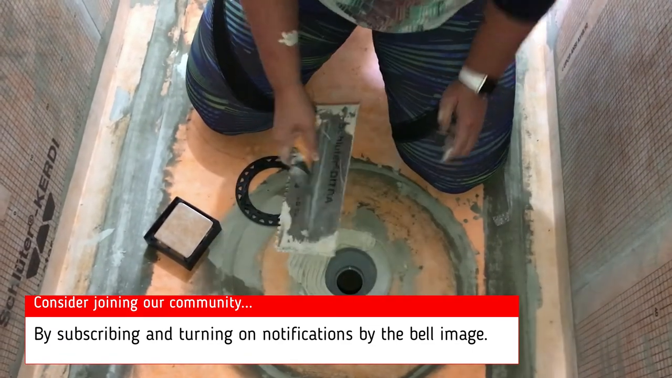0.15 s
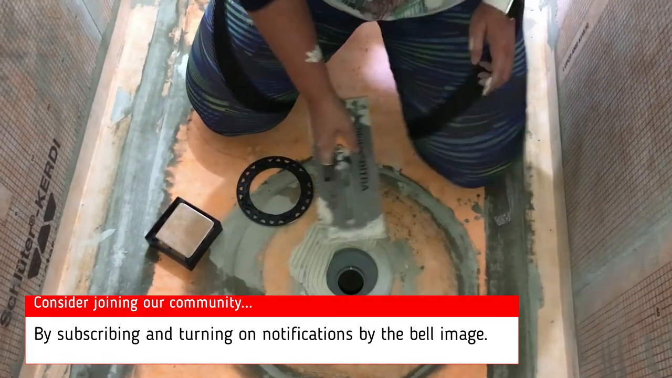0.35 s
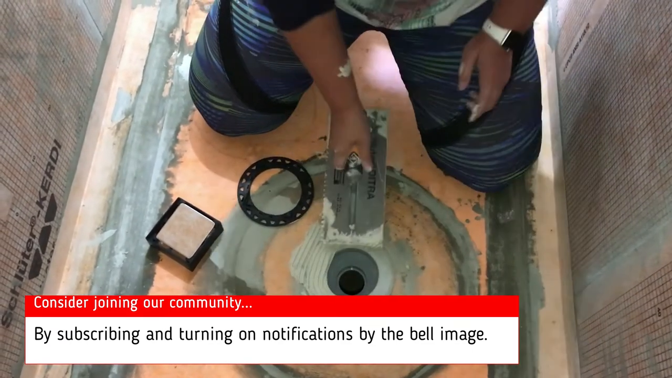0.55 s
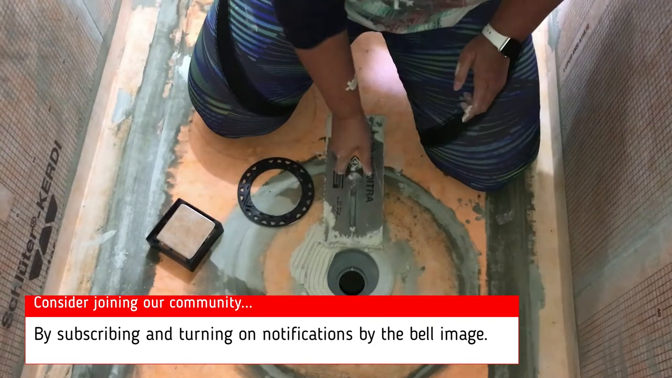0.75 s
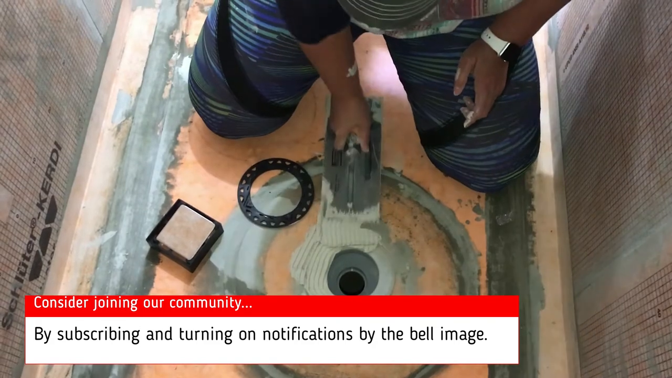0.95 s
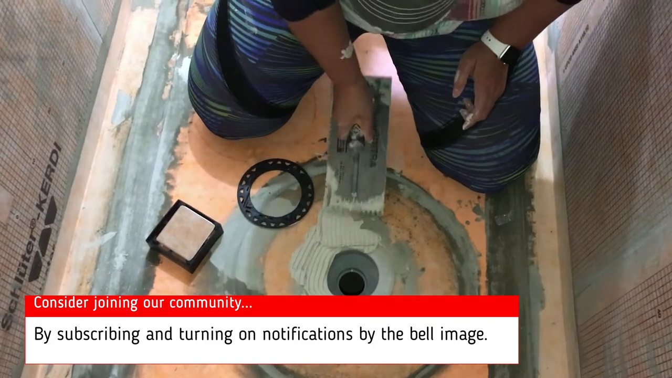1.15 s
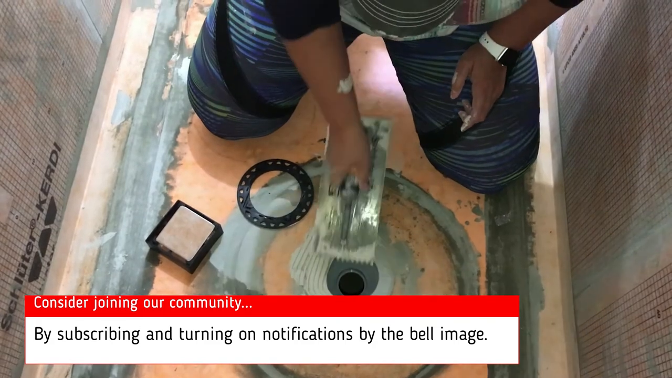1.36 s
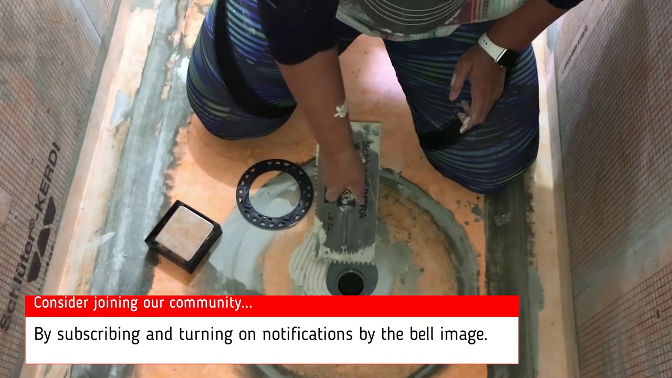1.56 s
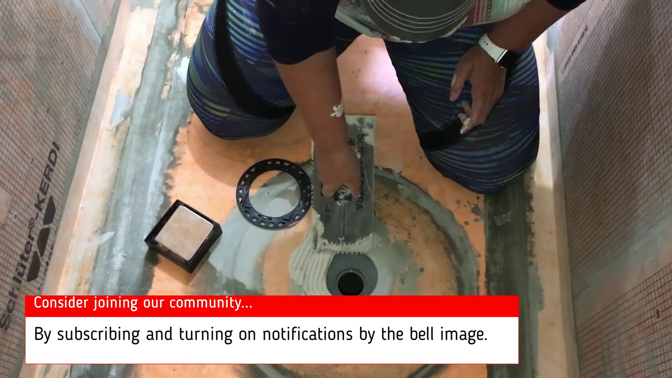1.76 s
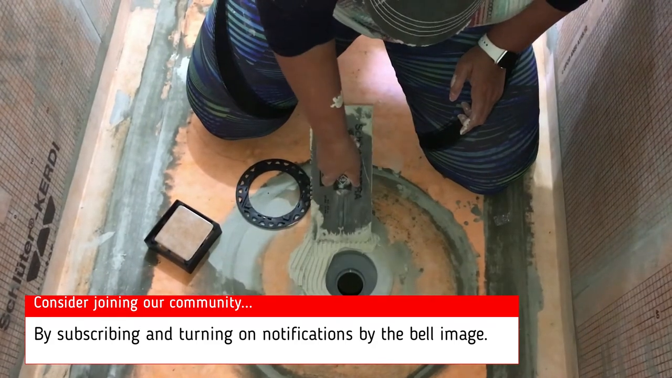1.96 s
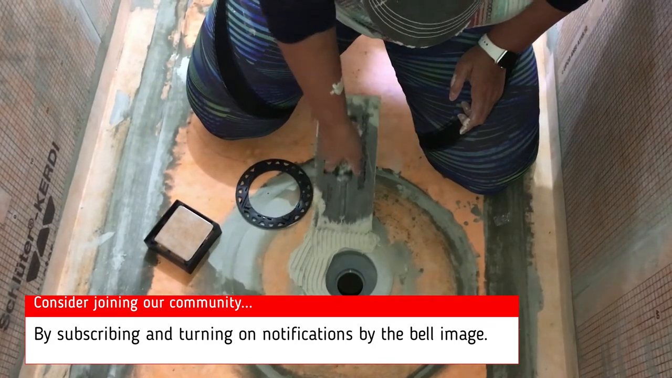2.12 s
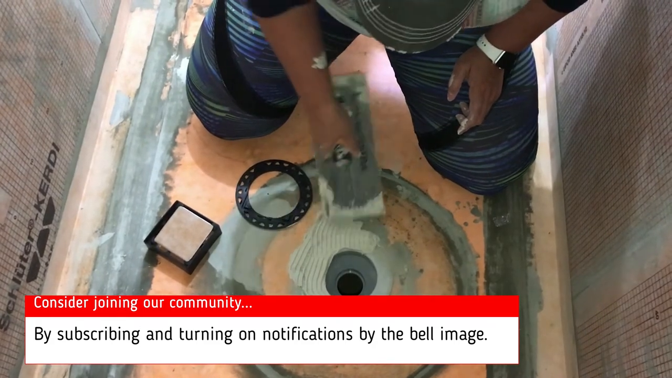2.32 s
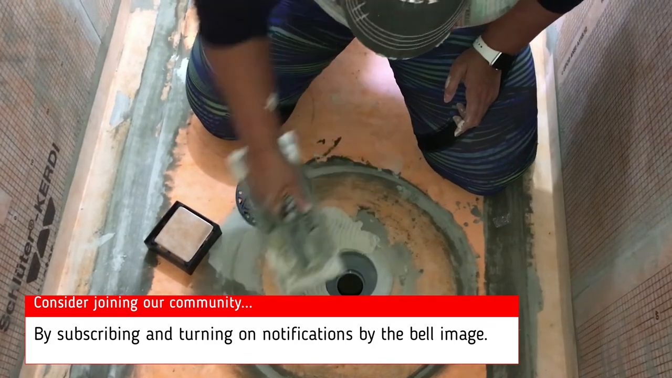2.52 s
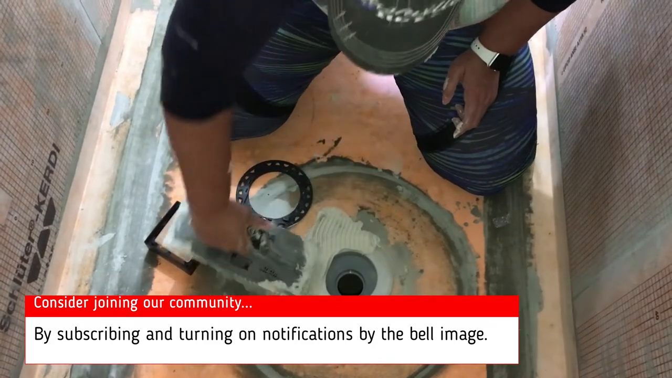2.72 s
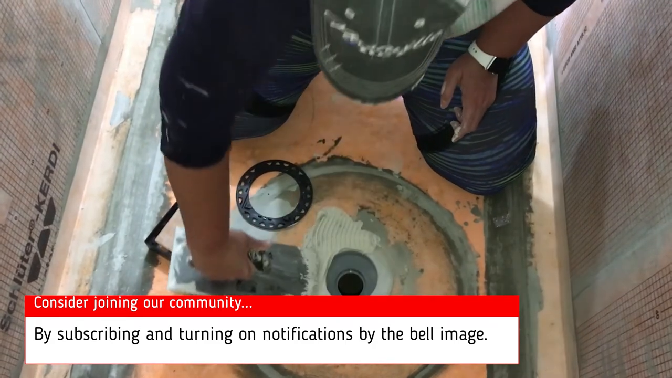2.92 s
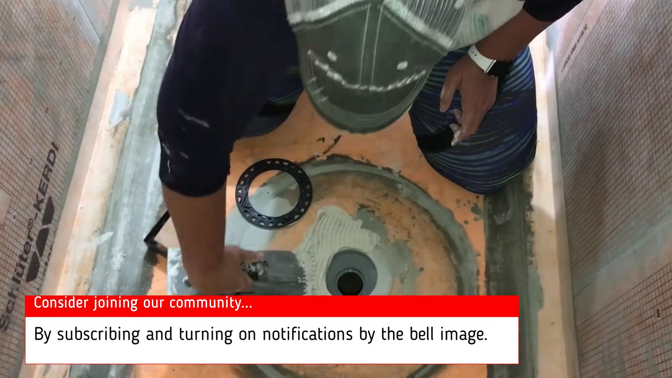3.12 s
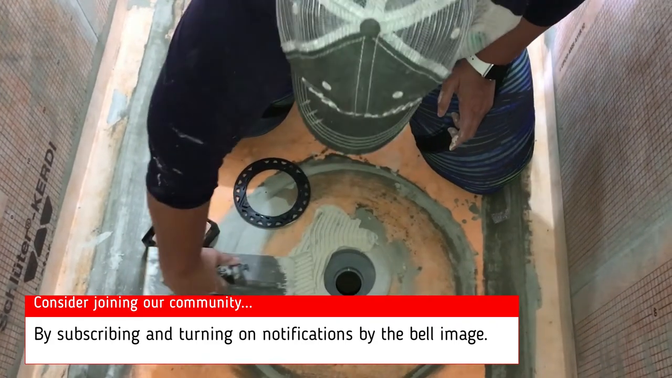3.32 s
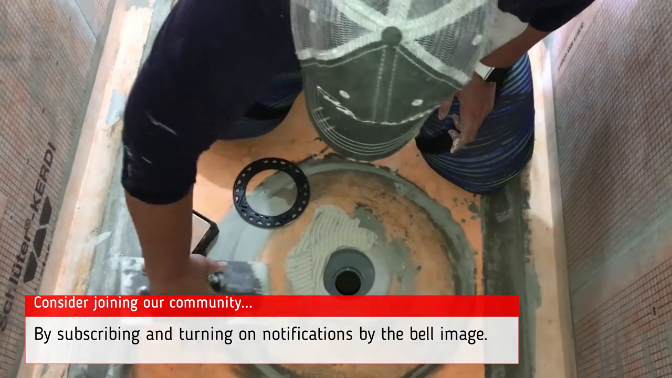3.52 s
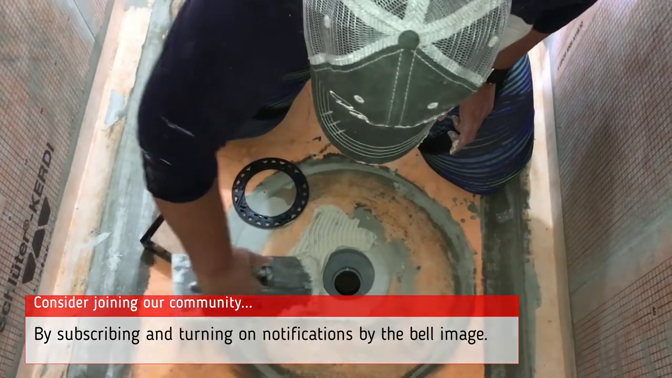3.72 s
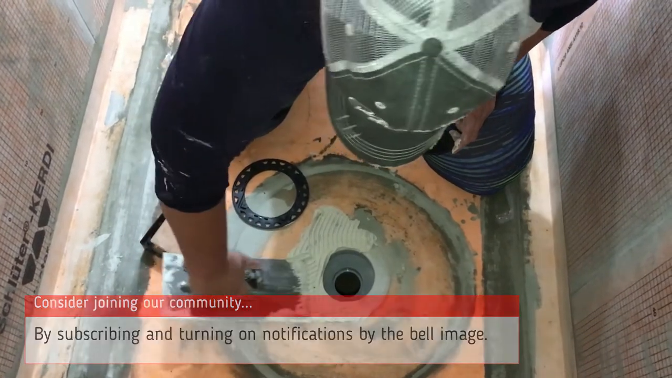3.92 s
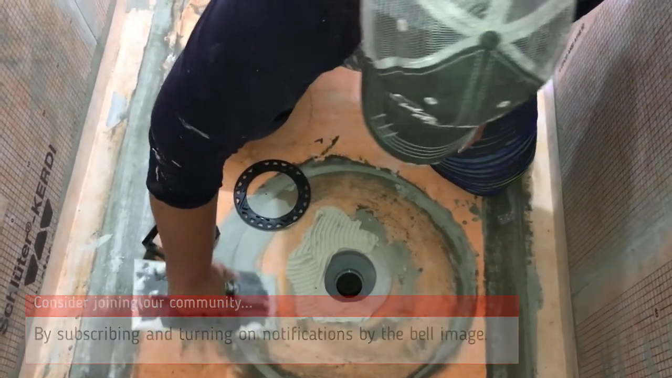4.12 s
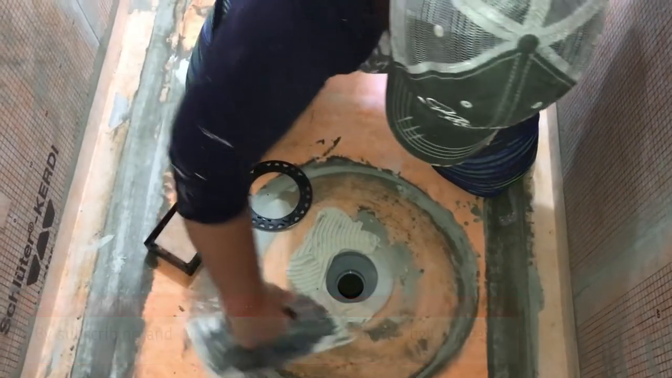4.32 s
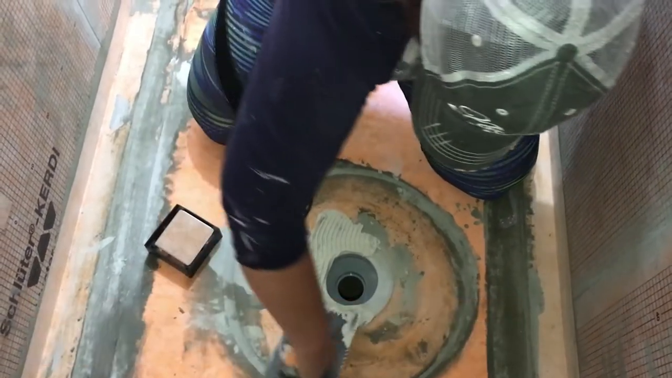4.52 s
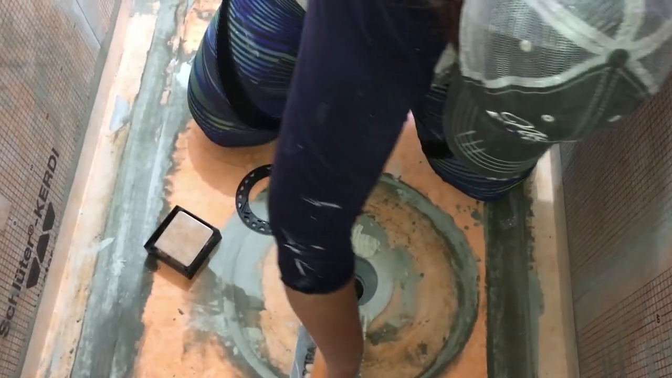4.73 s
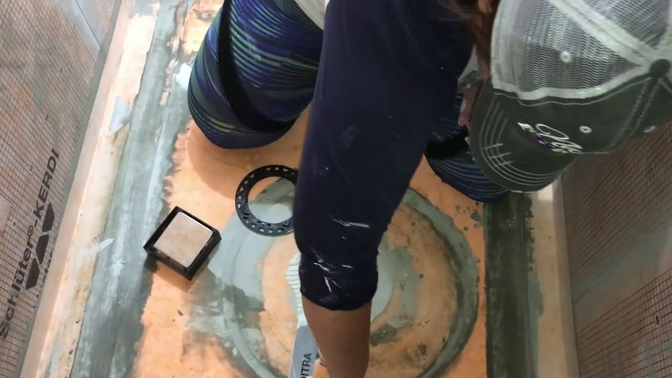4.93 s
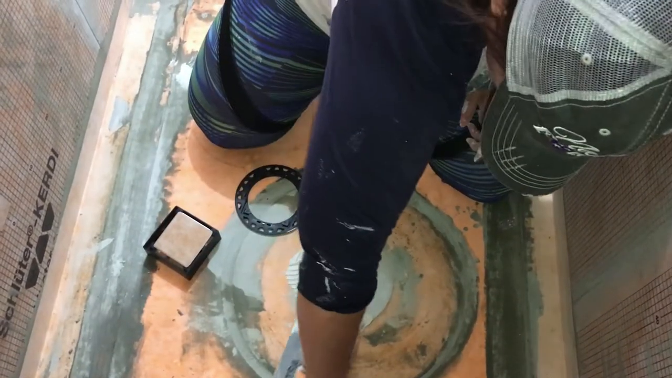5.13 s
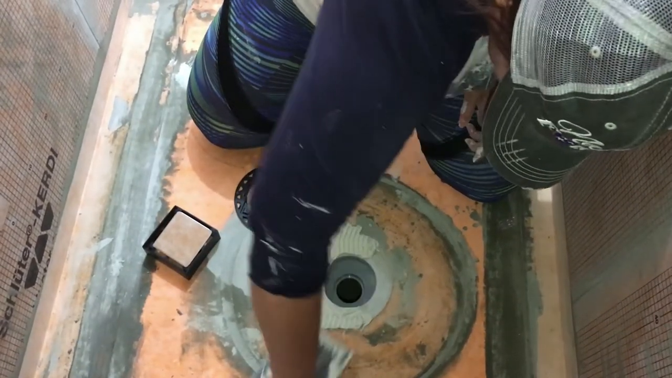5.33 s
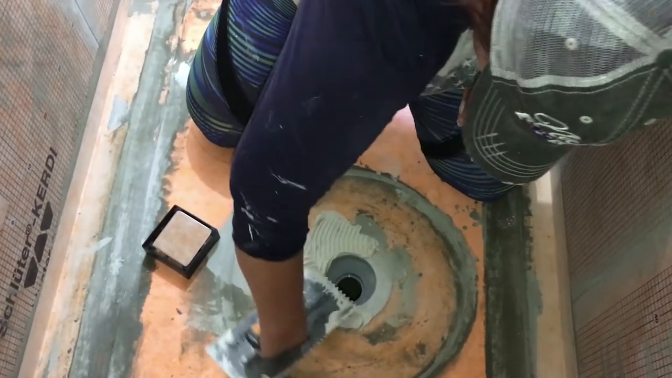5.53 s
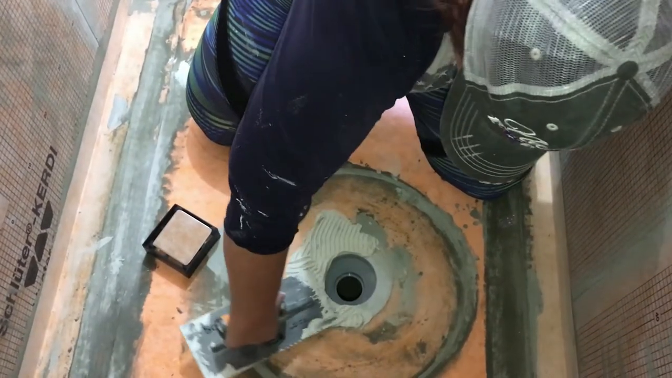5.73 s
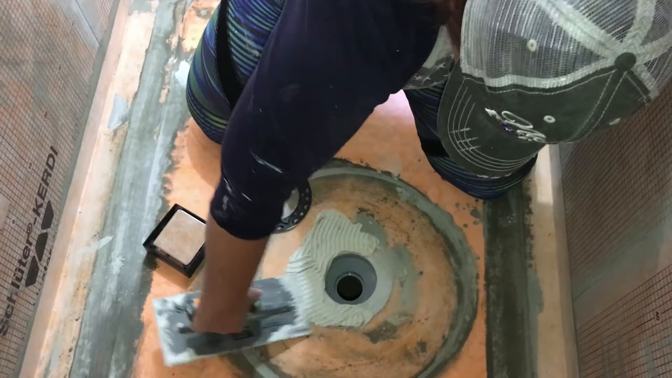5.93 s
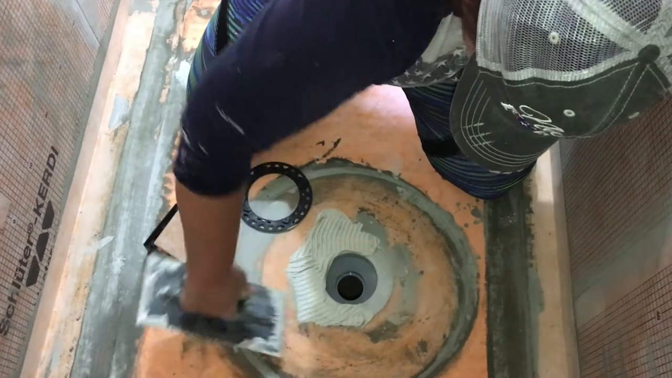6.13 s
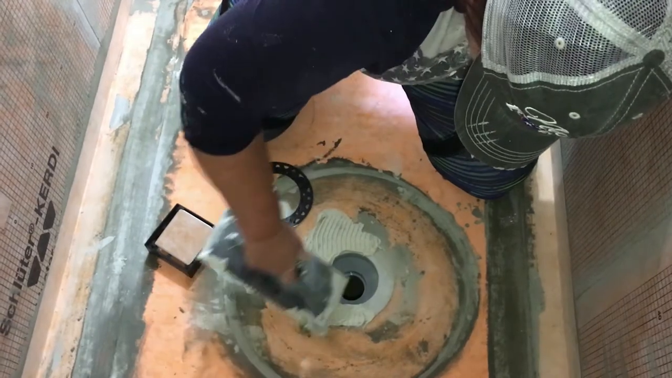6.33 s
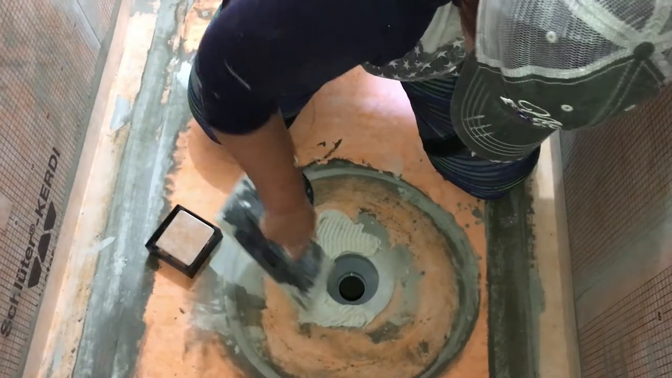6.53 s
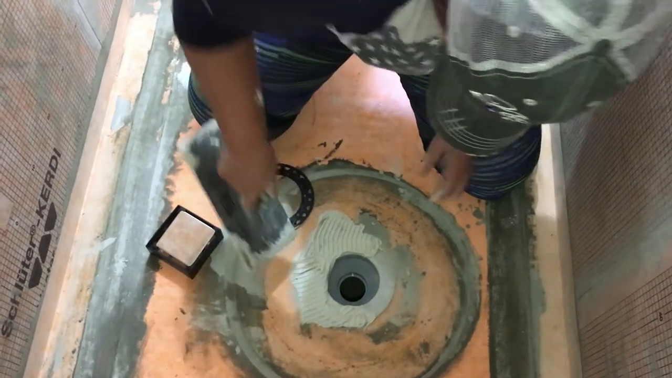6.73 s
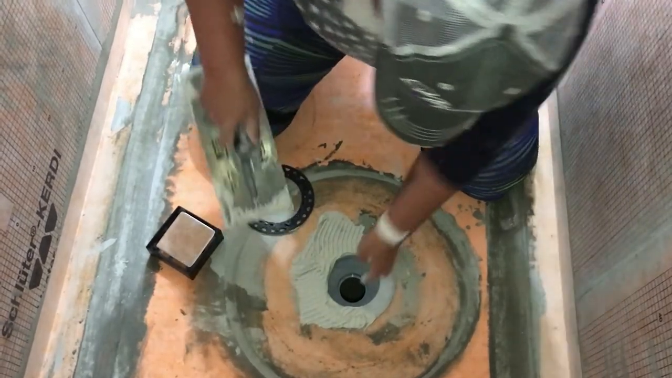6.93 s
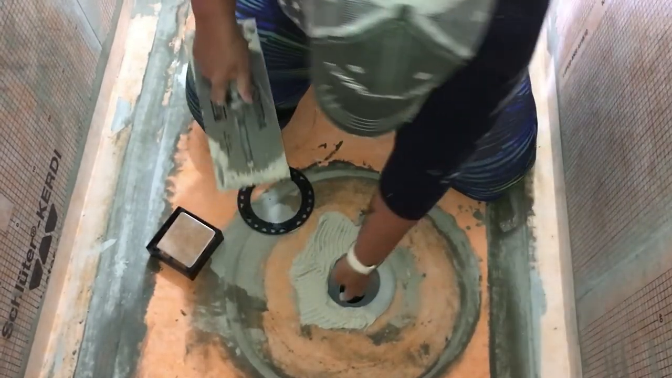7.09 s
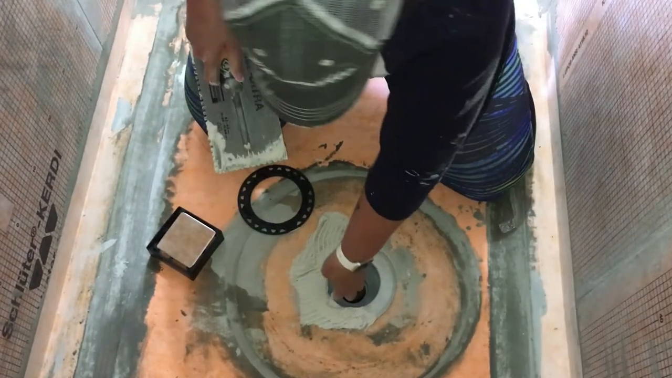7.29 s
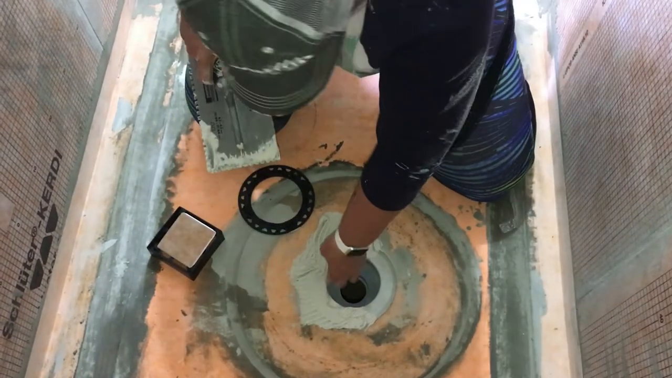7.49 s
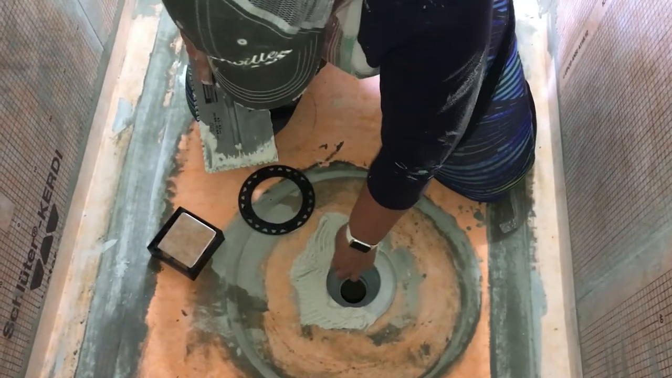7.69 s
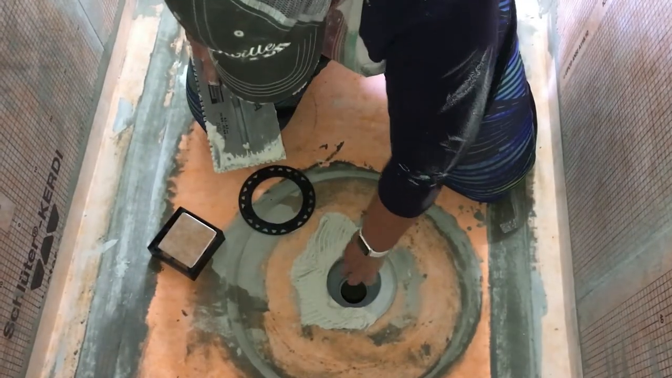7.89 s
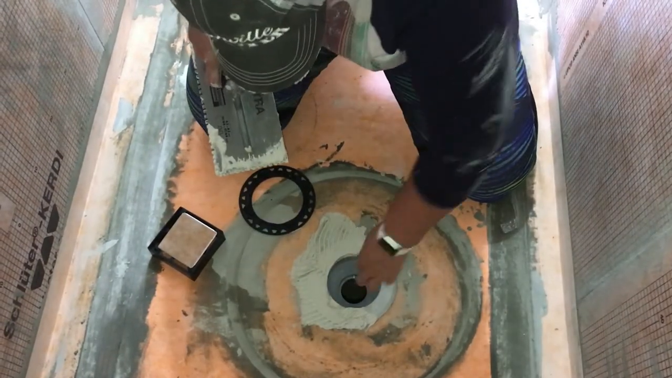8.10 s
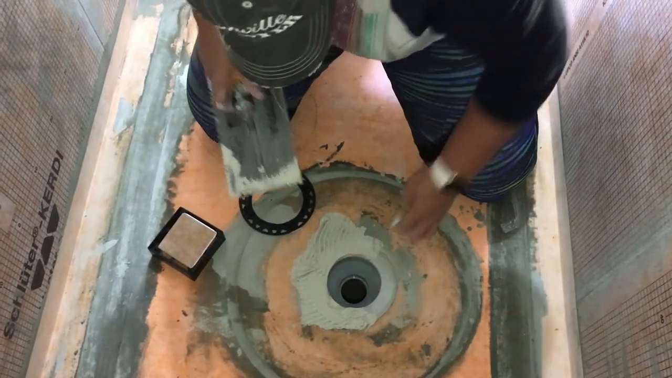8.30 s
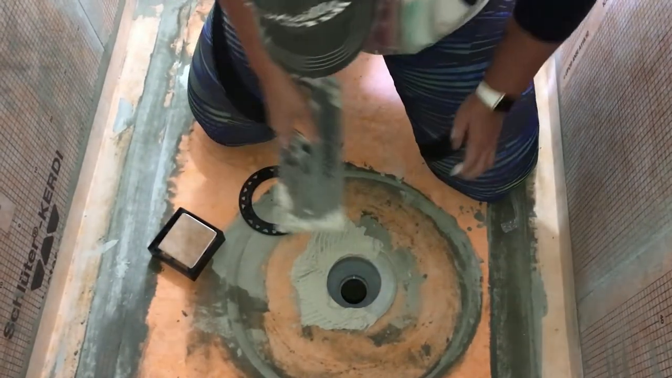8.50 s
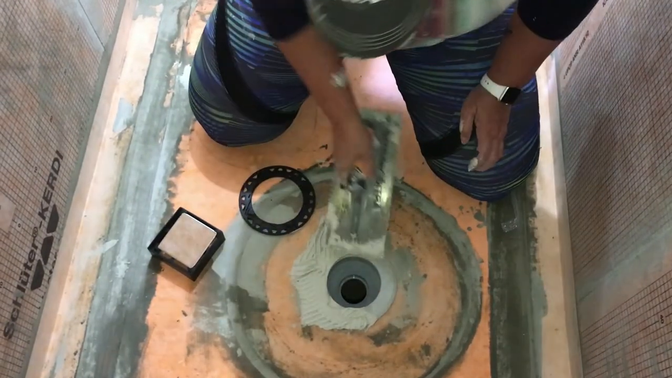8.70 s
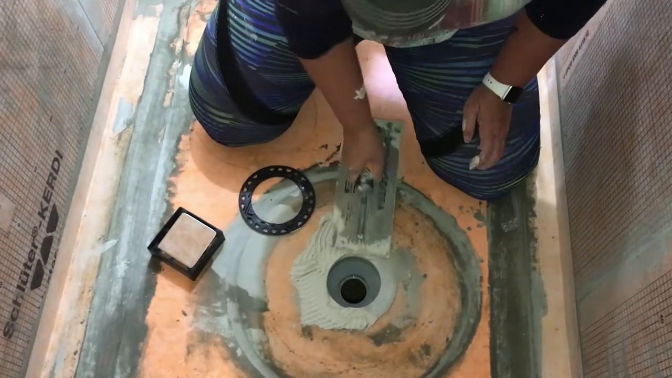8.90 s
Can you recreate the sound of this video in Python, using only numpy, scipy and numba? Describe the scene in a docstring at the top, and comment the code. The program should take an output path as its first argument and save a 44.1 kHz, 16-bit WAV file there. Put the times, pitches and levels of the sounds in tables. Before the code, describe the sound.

A close, fairly dry perspective in a small shower stall with a short hard-walled reverberation and a very faint low background. A soft rub and faint thin wavering tone open; at 0.4-0.6 s a steel trowel beds into wet mortar with a hiss and low thud. A bright gritty scrape at 1.0 s contains a brief metallic shriek. Small clinks and a light drag at 1.7-2.1 lead to the loudest short rasp at 2.2. Longer sandy strokes follow around 3.3 and 4.0, a thud preceding the latter, then one at 5.2. Each swells and sinks in pitch, hollow as the blade tilts. Clustered grit clicks from 5.6 end in a sharp clink at 5.85, then a last stroke at 6.0. Quiet rubs follow; from 7.6 to 8.0 a finger wipes the drain rim, its soft note rising. A faint rub at 8.4, then a soft knocking thud and tiny scrape at 8.9.

```python
"""Over a faint steady background come a soft rub and a thin tone; then a steel trowel beds into wet mortar.
It spreads the mortar round a drain in a small shower stall: clumped grain impulses excite a tuned rasp,
a sand hiss and a drumming floor, and the rasp sinks in pitch as the blade tilts. The blade lands with soft
thuds (decaying sines and noise), clinks on grit (noise bursts through blade modes) and once shrieks.
In a pause a finger wipes the rim of the drain: noise through a resonance whose note rises."""
import sys
import numpy as np
from scipy import signal
from scipy.fft import rfft, irfft, next_fast_len
from scipy.io import wavfile
from scipy.ndimage import uniform_filter1d
from numba import njit

SR = 44100
rng = np.random.default_rng(int(sys.argv[2]) if len(sys.argv) > 2 else 0)


def master_out(mix):
    """Clip the mix to full scale and print it as 16-bit PCM to the path in sys.argv[1]."""
    frames = np.transpose(np.atleast_2d(mix))
    ceiling = np.clip(frames, -1, 1)
    pcm = np.round(ceiling * 32767).astype(np.int16)
    wavfile.write(sys.argv[1], SR, pcm)


N = 394694
TIME = np.arange(N) / SR
SIZE = next_fast_len(N + SR)
FREQ = np.maximum(np.arange(SIZE // 2 + 1) * SR / SIZE, 1)

# blade knocks on grit: t/s, relative level/dB, treble re that level/dB
KNOCKS_ON_GRIT = [(0.872, -30, -28), (1.735, -26, -11), (1.779, -30, -18), (1.837, -21.5, -10),
                  (1.875, -19, -14), (1.933, -29, 2), (2.055, -23, 1), (3.071, -30, -1), (3.836, -29, -6.5),
                  (4.837, -27, 2), (5.064, -33, -3), (5.133, -26.5, 8.5), (5.635, -23.5, -15.5),
                  (5.675, -21, -30.5), (5.698, -19, -29), (5.75, -23.5, 5.5), (5.807, -20, -8.5),
                  (5.848, -8, -7), (8.869, -32, -3)]
# spectrum of fine sand friction: f/Hz, relative level/dB
HISS_SPECTRUM = [(1500, -6.5), (3000, 4), (4200, 2), (4950, 3), (7000, 1.5), (7700, -1.5), (8800, 3.5),
                 (10400, -1.5), (11600, 3.5), (16000, 0)]


def undb(db):
    """Amplitude gain is ten to the power of the level in decibels over 20."""
    return 10 ** (np.asarray(db) / 20)


def unit(x):
    """Normalization divides a signal by its root mean square."""
    return x / np.sqrt(np.mean(x ** 2))


def along(points, hz=FREQ):
    """Interpolation of (frequency, value) points is linear on a logarithmic frequency axis."""
    f, value = np.transpose(points)
    return np.interp(np.log(hz), np.log(f), value)


def response(db):
    """Minimum phase: folding the cepstrum makes a gain curve causal, with unit power for white noise."""
    cepstrum = irfft(np.log(unit(undb(db))), SIZE)
    cepstrum[1:SIZE // 2] *= 2
    cepstrum[SIZE // 2 + 1:] = 0
    return np.exp(rfft(cepstrum))


def through(x, gain):
    """Linear filtering multiplies the spectrum of a sound by a frequency response."""
    return irfft(rfft(x, SIZE) * gain, SIZE)[:N]


@njit
def resonate(x, hz, damping):
    """State-variable resonance with a moving centre: returns its band-pass and high-pass outputs."""
    band, high = np.empty(len(x)), np.empty(len(x))
    band_state, low_state = 0., 0.
    for i in range(len(x)):
        g = np.tan(np.pi * hz[i] / SR)
        v = (band_state + g * (x[i] - low_state)) / (1 + g * (g + damping))
        band[i] = damping * v
        high[i] = x[i] - damping * v - low_state - g * v
        band_state = 2 * v - band_state
        low_state = low_state + 2 * g * v
    return band, high


def walk(rate):
    """Random modulation: normal values drawn rate times a second, joined linearly, with spread near 1."""
    return 1.2 * np.interp(TIME * rate, np.arange(N), rng.standard_normal(N))


def grains(rate, spread_db):
    """Shot noise: randomly timed impulses of random sign and very unequal size, rms 1."""
    hit = rng.random(N) < rate / SR
    sign = np.sign(rng.standard_normal(N))
    size = undb(spread_db * np.clip(rng.standard_normal(N), -2, 2))
    return unit(hit * sign * size)


def swell(s, rise, hold, fall):
    """Gesture envelope: gain climbs to 1 at s, holds and dies away."""
    swell_db, curve = 24.5, 1.12  # depth after one rise or fall time; a curve above 1 steepens quiet ends
    away = np.maximum(s - TIME, 0) / rise + np.maximum(TIME - s - hold, 0) / fall
    return undb(-swell_db * np.minimum(away, 10) ** curve)


def blend(gestures):
    """Powers of gestures (gain, control, ..) add; each control is their power-weighted mean."""
    power = sum(g[0] ** 2 for g in gestures)
    controls = [sum(g[0] ** 2 * g[k] for g in gestures) / power for k in range(1, len(gestures[0]))]
    return [np.sqrt(power)] + controls


def body():
    """Modal resonance: Lorentzian peaks of blade and floor give a gain curve in dB for contact sounds."""
    # resonances of floor pan and stall: f/Hz, width/Hz, relative lift/dB
    floor_modes = [(84, 36, 6), (158, 60, 11), (222, 37, 5), (292, 45, 9), (362, 65, 8), (453, 70, 11),
                   (562, 55, 8), (612, 55, 5), (676, 50, 7)]
    # resonances of the blade: f/Hz, width/Hz, relative lift/dB
    blade_modes = [(980, 90, 7), (1210, 150, 7), (1335, 30, 4), (1472, 36, 7), (1573, 34, 6), (1810, 80, 6),
                   (2051, 38, 7), (2410, 60, 5), (2838, 36, 8), (3500, 90, 4), (4095, 130, 7),
                   (6020, 70, 5), (6515, 70, 6), (7170, 170, 7), (8600, 220, 4), (11145, 70, 6)]
    hz = np.geomspace(20, SR / 2, 3000)
    lift = sum(db / (1 + (2 * (hz - f) / width) ** 2) for f, width, db in floor_modes + blade_modes)
    # removing the local mean, over a little more than an octave, leaves peaks and valleys
    trend = uniform_filter1d(lift, size=350, mode="nearest")
    return 1.2 * np.interp(FREQ, hz, lift - trend)


def air():
    """Stationary noise: filtered white noise gives the faint, steady background of the house."""
    # spectrum of the background: f/Hz, relative level/dB
    air_spectrum = [(25, -25), (48, 6.5), (85, -5), (240, -11.5), (380, -10), (580, -13), (800, -19),
                    (1400, -17), (2300, -23), (16000, -32.5)]
    level_db = -65.5  # rms
    return undb(level_db) * unit(through(rng.standard_normal(N), undb(along(air_spectrum))))


def hand():
    """Friction controls: pressure, treble in dB and centre in Hz of light rubs and of the finger."""
    # light rubs of sleeve and hand:
    # full level at t/s, rise/s, hold/s, fall/s, relative level/dB, treble re level/dB, centre f/Hz
    rub_events = [(0.198, 0.14, 0.21, 0.11, -70, 10, 1380), (0.603, 0.14, 0.054, 0.12, -71, 11.5, 1340),
                  (2.975, 0.39, 0.12, 0.059, -77, 14, 1190), (4.525, 0.17, 0.45, 0.064, -82.5, 16, 1270),
                  (4.952, 0.054, 0.056, .05, -69.5, 5, 1280), (6.237, 0.061, 0.076, 0.082, -67, -2, 1350),
                  (6.651, 0.051, 0.054, 0.083, -62.5, 2, 1350), (8.431, 0.071, 0.11, 0.16, -68, 0, 1297)]
    # the finger works round the drain, in the main pressing harder as its note rises:
    # t/s, relative level/dB, treble re level/dB, note of the hollow f/Hz
    finger_path = [(7.152, -84, 17.5, 980), (7.5, -80, 15.5, 990), (7.6, -64.5, -12.5, 1020),
                   (7.76, -63.5, -13, 1080), (7.84, -61.5, -28, 1400), (7.943, -52.5, -11, 1370),
                   (8.009, -80, -6, 1444)]
    times, *columns = np.transpose(finger_path)
    finger_db, treble, note = (np.interp(TIME, times, c) for c in columns)
    within = (TIME > times[0]) & (TIME < times[-1])
    touching = uniform_filter1d(1. * within, size=220)  # 5 ms edges
    rubs = [(undb(db) * swell(s, rise, hold, fall), treble_db, hz)
            for s, rise, hold, fall, db, treble_db, hz in rub_events]
    return blend(rubs + [(touching * undb(finger_db), treble, note)])


def wipes(ring):
    """Friction noise excites a narrow resonance, whose note rises as the finger works round the drain."""
    # spectrum of soft rubbing: f/Hz, relative level/dB
    wipe_spectrum = [(300, 3), (700, 4.5), (1400, -3), (2300, 1.5), (3200, 3), (5000, -3.5), (10000, -7)]
    hollow_gain_db, smear_gain_db, damping = 1.0, -2, 0.12
    pressure, treble_db, hollow_hz = hand()
    rub = undb(2.5 * walk(70)) * rng.standard_normal(N)
    tuned = resonate(rub, hollow_hz, damping)[0] + .17 * rub
    hollow = unit(through(tuned, response(along(wipe_spectrum) + .5 * ring)))
    smear = undb(treble_db) * through(rub, response(along(HISS_SPECTRUM)))
    return pressure * (undb(hollow_gain_db) * hollow + undb(smear_gain_db) * smear)


def tones():
    """Frequency and amplitude modulation: random walks make faint, thin sine tones waver."""
    # faint thin tones before, between and after the strokes: full level at t/s, hold/s, level/dB, f/Hz
    tone_events = [(0.105, 0.118, -68.5, 1320), (4.35, 0.3, -76.5, 1256), (8.05, 0.4, -75, 1420)]
    fade_s, waver = 0.035, 0.017  # waver is a fraction of the pitch
    out = np.zeros(N)
    for s, length, db, hz in tone_events:
        phase = 2 * np.pi * np.cumsum(hz * (1 + waver * walk(97))) / SR
        tone = unit(undb(4.4 * walk(40)) * np.sin(phase))
        out += undb(db) * swell(s, fade_s, length, fade_s) * tone
    return out


def blade():
    """Gap tuning: tilt opens the gap, so the rasp sinks, sand hiss fades and the floor drums more."""
    # light drags of the blade and a hissing flick of its edge: full level at t/s, rise/s, hold/s,
    # relative rasp level/dB, relative sand hiss re rasp/dB, relative floor drumming re rasp/dB,
    # rasp centre f/Hz
    light_events = [(0.367, 0.058, 0.13, -47, 2.5, -16, 510), (0.868, 0.011, 0.045, -52.5, -7, 9, 1110),
                    (1.744, .01, 0.17, -51.5, -11, -8.5, 1096), (1.949, .02, 0.32, -45.5, -1, -10, 730),
                    (3.223, 0.027, 0.076, -43.5, -0.5, -16.5, 1700),
                    (5.065, 0.0089, 0.069, -44.5, -0.5, -18, 1290),
                    (5.639, 0.0069, 0.24, -44, -8, -8, 1370), (6.103, .012, 0.016, -41, 9, -12, 750),
                    (8.929, 0.018, .02, -52, -6.5, -10, 600)]
    # a stroke swells, holds and dies as the blade lifts: full speed at t/s, rise/s, hold/s, fall/s,
    # relative rasp level/dB, relative sand hiss re rasp/dB, relative floor drumming re rasp/dB,
    # rasp centre of the flat blade f/Hz, final tilt/0-1
    stroke_events = [(0.47, 0.084, 0.015, 0.15, -47, 10.5, -13.5, 580, 0.46),
                     (0.971, 0.094, 0.096, 0.11, -30.5, -2.5, -19, 1770, 0.24),
                     (2.211, 0.053, 0.048, 0.071, -27.5, 0, -15, 1410, 0.7),
                     (3.318, 0.11, 0.18, 0.13, -31, -2.5, -20, 1980, 1.0),
                     (4.008, .11, 0.1, 0.11, -29, -3, -18, 1840, 0.88),
                     (5.2, 0.11, 0.05, 0.1, -29, -4, -16, 1500, 0.7),
                     (5.965, 0.11, 0.094, 0.12, -30.5, -2.5, -18, 1750, 0.99)]
    light_fall_s = 0.011
    tilt_s, tilt_lead_s = 0.039, 0.0034  # time constant; lead of mid-tilt before the end of the hold
    tilt_octaves, tilt_hiss_db, tilt_drum_db = -1.99, -12, 11  # changes at full tilt
    gestures = [(undb(db) * swell(s, rise, length, light_fall_s), hiss_db, drum_db, hz)
                for s, rise, length, db, hiss_db, drum_db, hz in light_events]
    for s, rise, hold, fall, db, hiss_db, drum_db, hz, final_tilt in stroke_events:
        progress = .5 * (1 + np.tanh((TIME - s - hold + tilt_lead_s) / (2 * tilt_s)))
        tilt = min(final_tilt, 1) * progress
        gestures.append((undb(db) * swell(s, rise, hold, fall),
                         hiss_db + tilt_hiss_db * tilt,
                         drum_db + tilt_drum_db * tilt,
                         hz * 2 ** (tilt_octaves * tilt)))
    return blend(gestures)


def snags():
    """Stick before slip: grit holds the blade up just before it knocks free, so the rasp falters."""
    speed = np.ones(N)
    for s, _, _ in KNOCKS_ON_GRIT:
        start, stall_length = int(s * SR), SR // 50  # 20 ms
        speed[start - stall_length:start] *= np.linspace(1, .25, stall_length)
    return speed


def scrape(ring, hiss_gain):
    """Stick-slip of sand grains excites the gap beneath the blade, which tunes the rasp; the floor drums."""
    # spectrum of the rasp: f/Hz, relative level/dB
    rasp_spectrum = [(250, 1.5), (450, 0.5), (800, 0.5), (1200, 0), (2000, 0.5), (3000, -4.5),
                     (4500, -11.5), (8000, -39.5)]
    # spectrum of the drumming floor: f/Hz, relative level/dB
    drum_spectrum = [(40, -19.5), (80, -2.5), (160, -4), (260, -11), (400, -9), (700, -11), (1500, -55.5)]
    clump_rate, clump_db = 260, 2.0  # changes per second, spread
    damping, broad = 1.0, 0.24  # of the gap; share of untuned grains
    low_edge, high_edge = 0.57, 3.28  # band edges re gap centre
    rasp_gain_db, hiss_gain_db, drum_gain_db = -2.1, -0.85, 2.95

    pressure, hiss_db, drum_db, gap_hz = blade()
    clumps = unit(undb(clump_db * walk(clump_rate)))
    force = pressure * snags() * clumps
    coarse = grains(rate=5000, spread_db=4.5)
    fine = unit(0.27 * coarse + grains(rate=15000, spread_db=2.5))
    # the gap radiates a band with steep edges that slides down as it opens
    tuned = resonate(coarse, gap_hz, damping)[0] + broad * coarse
    for _ in range(2):
        tuned = resonate(tuned, low_edge * gap_hz, 0.76)[1]
        band, high = resonate(tuned, np.minimum(high_edge * gap_hz, SR / 3), 0.71)
        tuned = tuned - band - high  # the low-pass side
    # a fixed broad resonance at 480 Hz adds a low body to the rasp
    low_body = resonate(coarse, np.full(N, 480.), .8)[0]
    tuned = tuned + undb(-14) * low_body
    # short-time power is levelled, so tilt colours the rasp and force alone sets its loudness
    rasp_gain = response(along(rasp_spectrum) + ring)
    power = uniform_filter1d(through(tuned, rasp_gain) ** 2, size=1300)
    rasp = through(force * tuned / np.sqrt(power + 1e-9), rasp_gain)
    hiss = through(force * undb(hiss_db) * fine, hiss_gain)
    drum_grains = grains(rate=1500, spread_db=1.5)
    drum = through(force * undb(drum_db) * drum_grains, response(along(drum_spectrum) + ring))
    return undb(rasp_gain_db) * rasp + undb(hiss_gain_db) * hiss + undb(drum_gain_db) * drum


def thuds(ring):
    """Impact response: the landing blade makes the floor pan bounce on its lowest mode and knock above it."""
    # the trowel lands: t/s, relative level/dB, knock re thud before layer gains/dB, bounce of the pan f/Hz
    landings = [(0.527, -40.5, -3, 50.4), (1.747, -52.5, -23, 61.5), (3.071, -52, 1, 81.5),
                (3.839, -35.5, -10.5, 60), (4.844, -51, -3, 64), (5.645, -40, -10, 58),
                (8.873, -41, 6, 57.8)]
    # spectrum of the push: f/Hz, relative level/dB
    push_spectrum = [(25, -24), (48, 3), (85, -7.5), (160, -4.5), (300, -34), (1000, -79.5)]
    # spectrum of the knock: f/Hz, relative level/dB
    knock_spectrum = [(100, -7), (330, 9.5), (550, 2.5), (900, -5.5), (2500, -54), (8000, -64)]
    bounce_gain_db, push_gain_db, knock_gain_db = 1.5, 17, -6
    pan_decay_s, knock_decay_s = .028, 0.029
    bounce, push, knock = np.zeros(N), np.zeros(N), np.zeros(N)
    for s, db, hard_db, pan_hz in landings:
        start = int(s * SR)
        age = TIME[:N - start]
        bounce[start:] += undb(db) * np.sin(2 * np.pi * pan_hz * age) * np.exp(-age / pan_decay_s)
        push[start] += undb(db)
        knock[start:] += undb(db + hard_db) * np.exp(-age / knock_decay_s)
    thump = through(push, response(along(push_spectrum) + ring))
    low = undb(bounce_gain_db) * bounce + undb(push_gain_db) * thump
    hard = through(knock * rng.standard_normal(N), response(along(knock_spectrum) + ring))
    return low + undb(knock_gain_db) * hard


def clinks(ring, hiss_gain):
    """Impulsive excitation: crushed grit rings the blade for milliseconds, then crumbs settle."""
    # spectrum of the struck blade: f/Hz, relative level/dB
    steel_spectrum = [(150, -44), (600, 3), (1100, 4.5), (2400, 6.5), (4000, -3), (7000, -7.5),
                      (15000, -21.5)]
    steel_gain_db, crack_gain_db = -10, -10
    crush_s, crumble_s, crumble_db = 0.0023, 0.027, -11  # decay times; crumbs re crush
    give_s = .0001  # onset time constant at a gain of 1
    crush, crack = np.zeros(N), np.zeros(N)
    for s, db, treble_db in KNOCKS_ON_GRIT:
        start = int(s * SR)
        age = TIME[:min(SR // 5, N - start)]
        burst = undb(db) * (np.exp(-age / crush_s) + undb(crumble_db) * np.exp(-age / crumble_s))
        # wet mortar cushions a light touch more than a hard one
        burst = burst * (1 - np.exp(-age * undb(db) / give_s))
        crush[start:start + len(burst)] += burst
        crack[start:start + len(burst)] += burst * undb(treble_db)
    grit = grains(rate=20000, spread_db=7.0)
    steel = through(crush * grit, response(along(steel_spectrum) + ring))
    return undb(steel_gain_db) * steel + undb(crack_gain_db) * through(crack * grit, hiss_gain)


def shrieks(ring):
    """Modal excitation: the bare edge bites through the mortar and chatters, so the blade's modes stand out."""
    # bites of the edge: t/s, relative level/dB, half length/s
    bites = [(1.013, -25.5, 0.032)]
    # spectrum of the chattering edge: f/Hz, relative level/dB
    edge_spectrum = [(1000, 3), (1500, 1.5), (2050, 2), (2800, -1), (4100, -13.5), (7000, -19),
                     (12500, -22.5), (16000, -17.5)]
    low_hz = 1150  # the bass falls away below this
    bite = sum(undb(db) * np.exp(-((TIME - s) / length) ** 2) for s, db, length in bites)
    above_floor = -10 * np.log10(1 + (low_hz / np.maximum(FREQ, 300)) ** 12)
    singing = 1.8 * ring
    chatter = bite * grains(rate=4100, spread_db=1.0)
    return through(chatter, response(along(edge_spectrum) + above_floor + singing))


def stall(dry):
    """Reverberation: close walls return dense noise whose octave bands decay sooner in the treble."""
    # reverberation time of the stall: f/Hz, t60/s
    decay_times = [(80, 0.46), (500, 0.47), (1500, 0.34), (4000, .3), (14000, 0.024)]
    wet_db, first_s = -4, 0.0033  # the tail is silent until first_s and full at twice that
    age, tail = TIME[:SR], 0
    noise = rfft(rng.standard_normal(SR))
    octave = np.log2(np.arange(len(noise)) + 1)  # bins are 1 Hz apart
    for k in np.arange(5, 15):
        t60 = along(decay_times, 2. ** k)
        band = irfft(noise * np.maximum(1 - abs(octave - k), 0), SR)
        tail = tail + band * np.exp(-np.log(1000) * age / t60)
    onset = np.clip(age / first_s - 1, 0, 1)
    # scaled by the energy of a decay with the t60 at 1 kHz
    tail = tail * onset / np.sqrt(SR * along(decay_times, 1000) / np.log(1e6))
    return dry + undb(wet_db) * through(dry, rfft(tail, SIZE))


def scene():
    """Superposition: contacts are coloured by blade and floor and reverberate; tones and air are added dry."""
    ring = body()
    hiss_gain = response(along(HISS_SPECTRUM) + ring)
    work = wipes(ring) + scrape(ring, hiss_gain) + thuds(ring) + clinks(ring, hiss_gain) + shrieks(ring)
    return (undb(0.63) * stall(work) + tones() + air())[None]


def record(dry):
    """Band limiting: a steep elliptic low-pass filter cuts the top."""
    top_hz = 16050
    low_pass = signal.ellip(10, .2, 70, top_hz, fs=SR, output="sos")  # order, ripple dB, stop-band dB
    return signal.sosfilt(low_pass, dry)


dry = scene()
out = record(dry)
master_out(out)
```